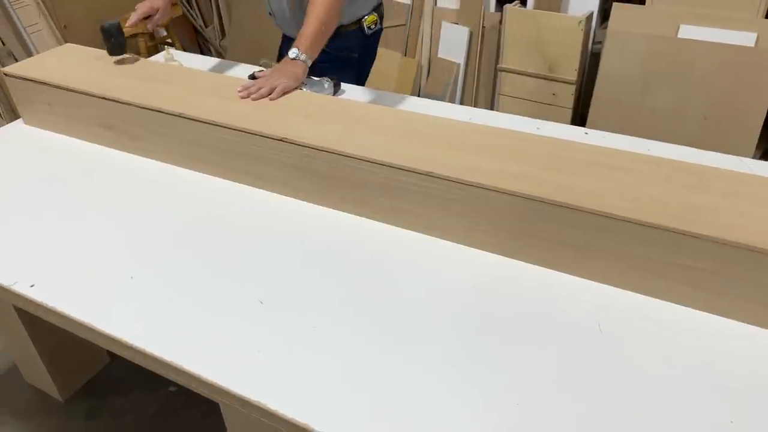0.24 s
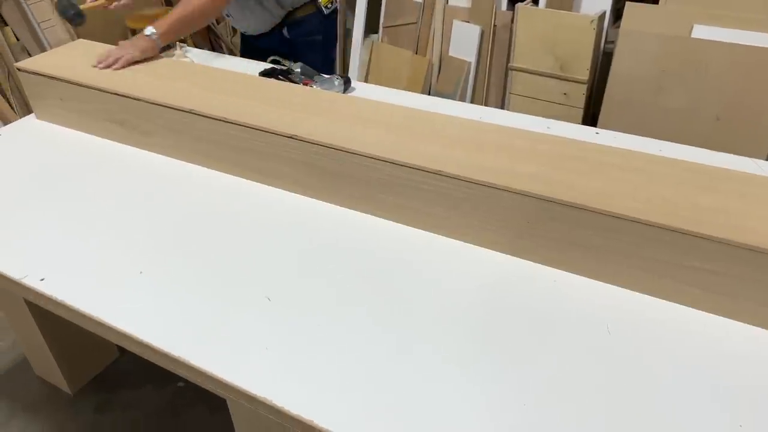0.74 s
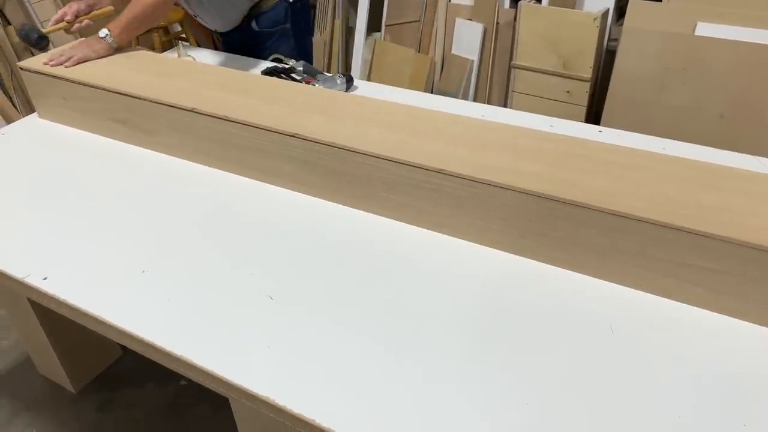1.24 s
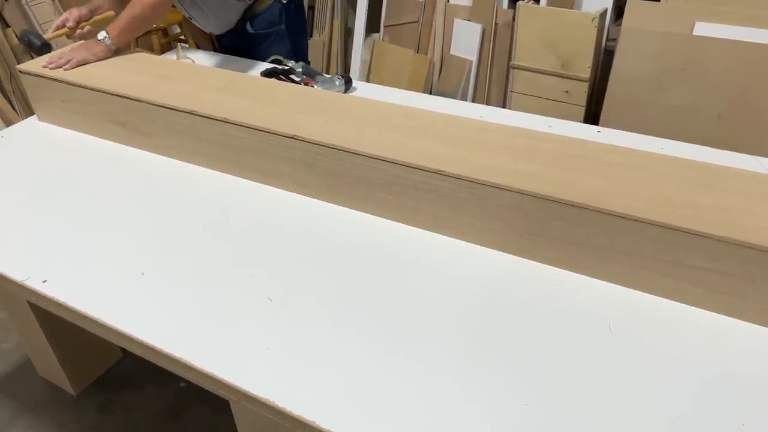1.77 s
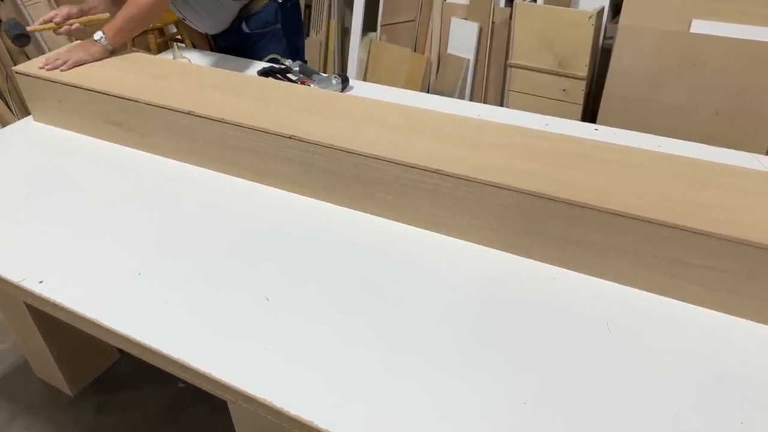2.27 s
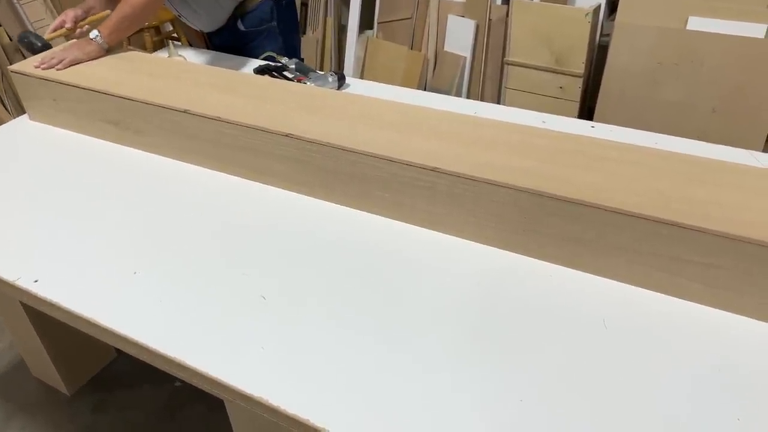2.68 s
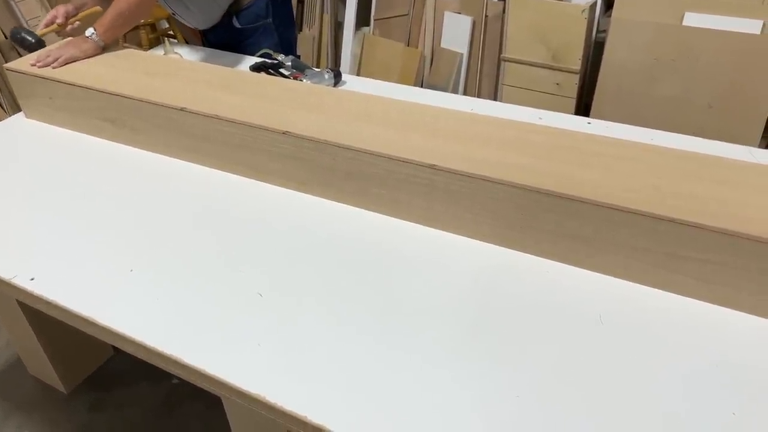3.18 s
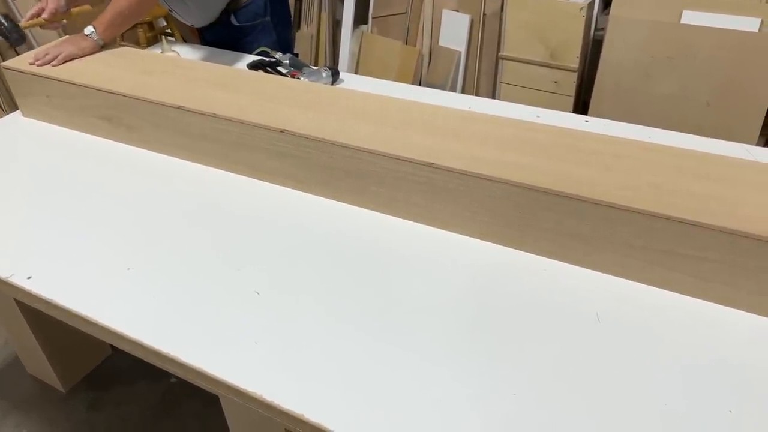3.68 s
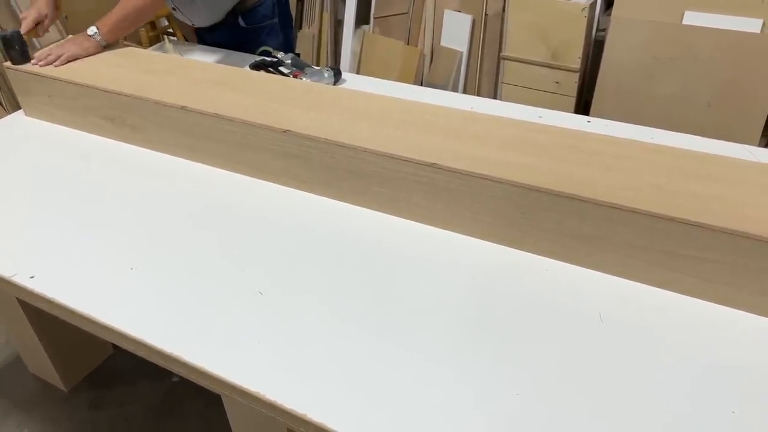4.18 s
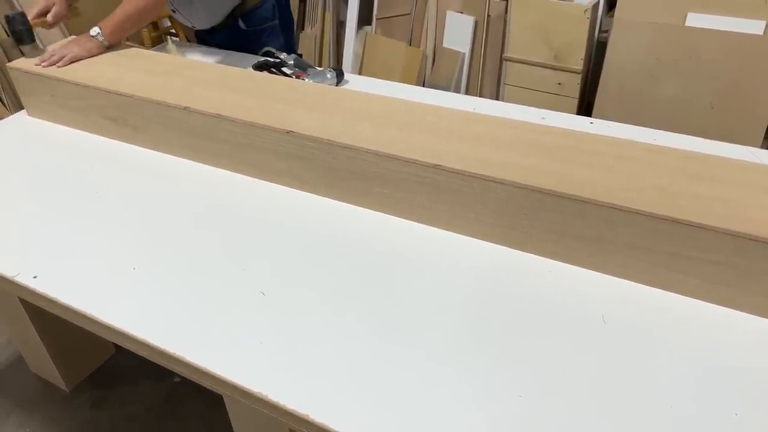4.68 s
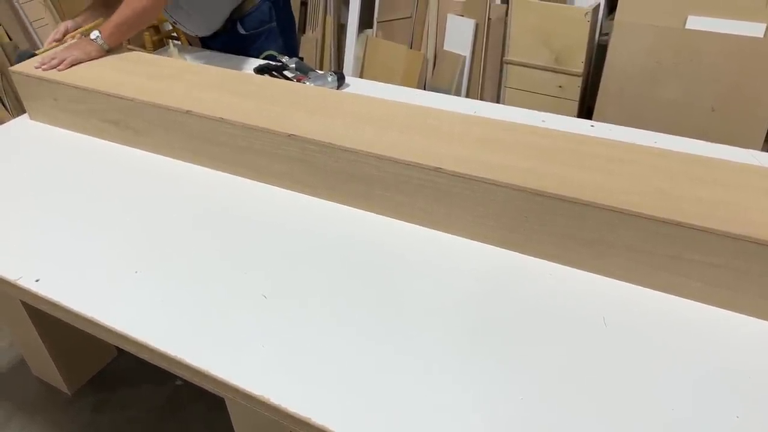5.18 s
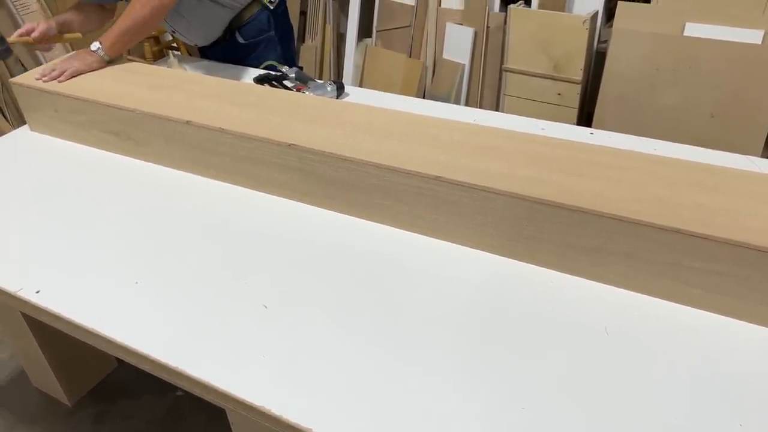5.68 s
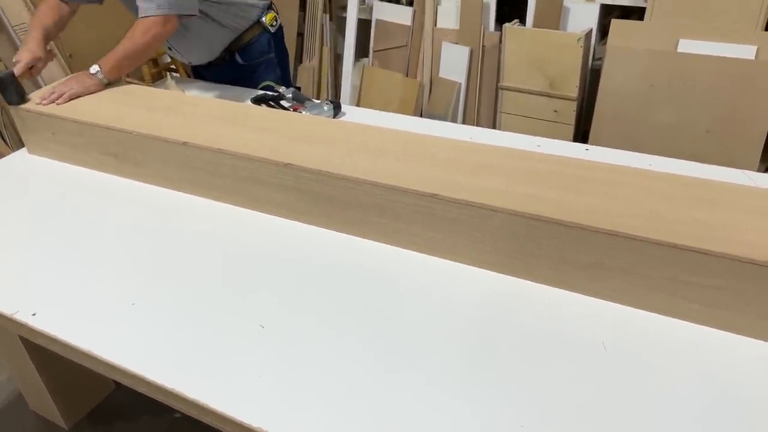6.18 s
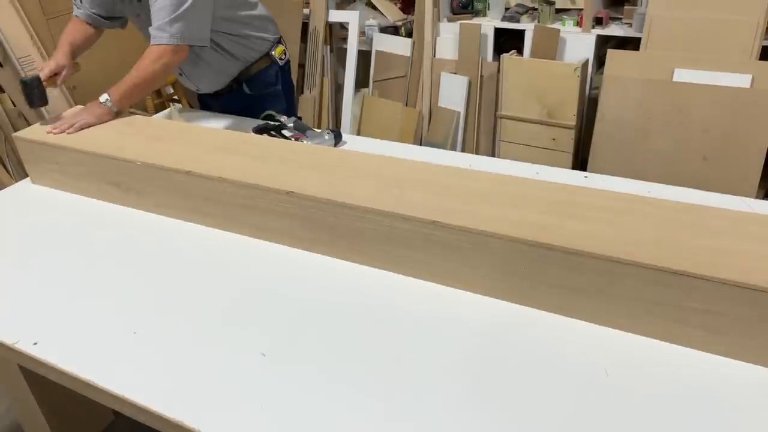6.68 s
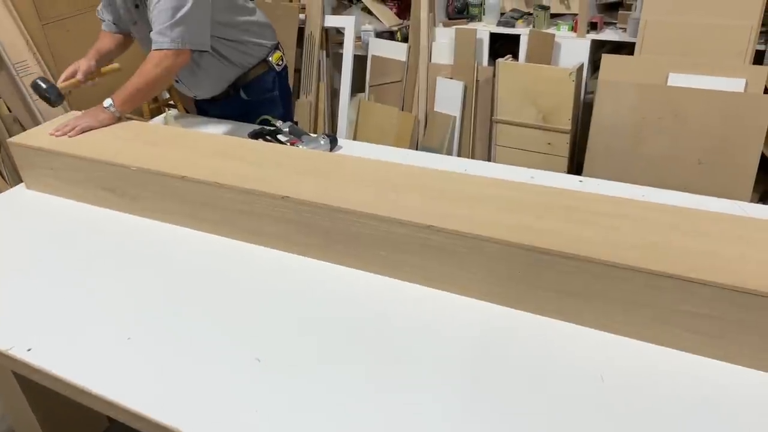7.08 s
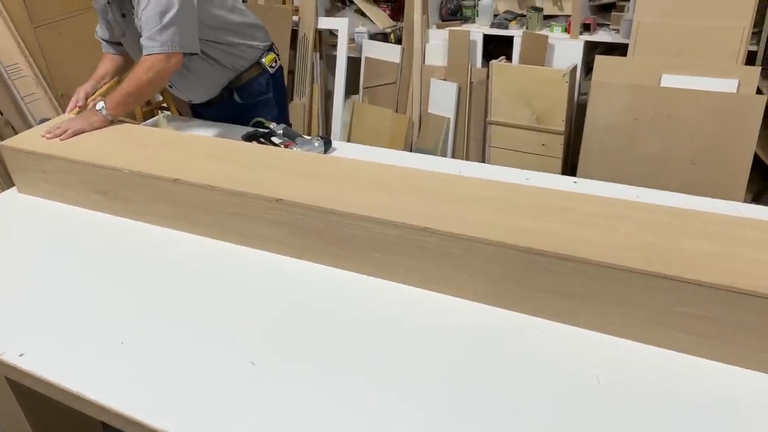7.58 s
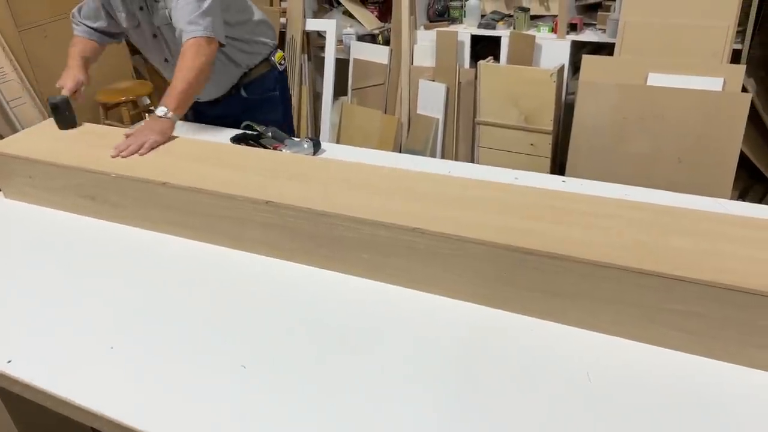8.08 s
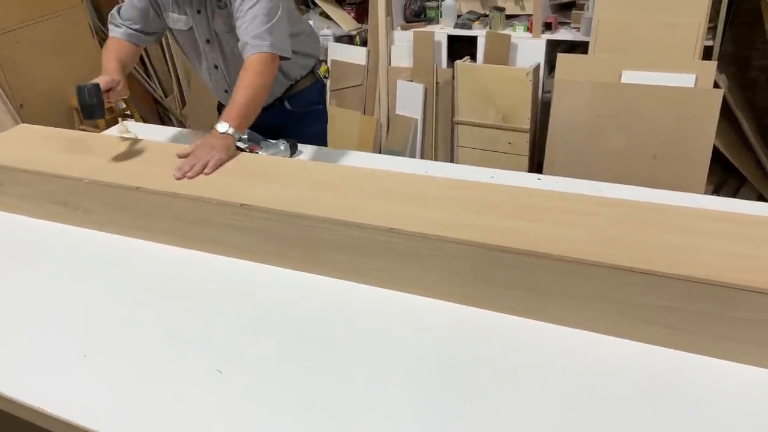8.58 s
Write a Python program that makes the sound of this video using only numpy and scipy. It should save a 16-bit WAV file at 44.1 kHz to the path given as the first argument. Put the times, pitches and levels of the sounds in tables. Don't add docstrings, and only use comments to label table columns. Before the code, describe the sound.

A rubber mallet knocks a long wooden board onto a hollow plywood box, uneven hard cracking thuds ringing briefly in a live workshop over faint hiss.

```python
import sys
import numpy as np
from scipy import signal
from scipy.fft import rfft, irfft
from scipy.io import wavfile

SR = 44100
rng = np.random.default_rng(int(sys.argv[2]) if len(sys.argv) > 2 else 0)


def digitize_waveform(pressure):
    field = np.atleast_2d(pressure).T
    bounded = np.clip(field, -1, 1)
    quanta = np.round(bounded * 32767).astype(np.int16)
    wavfile.write(sys.argv[1], SR, quanta)


def ratio(d):
    e = np.asarray(d, float) / 20
    return 10 ** e


N = 389844

# start in seconds, force in dB, backing in dB (how solidly the spot
# rests on the bench), slap of the closing joint in dB, spot in Hz (pitch of the panels nearest the head).
BLOWS = [(0.1338, -10.5, 3, -6.5, 450), (0.3142, -11.5, 0.5, -6.5, 565), (1.333, -17.5, -6.5, -13.5, 557),
         (1.6603, -7.5, -11.5, -9, 725), (1.7043, -10, -19, -19.5, 700), (2.0015, -3.5, -9, -4, 497),
         (2.3487, -1, -10.5, -11, 586), (2.6945, -1.5, -10.5, -10.5, 578), (3.0324, -6.5, -5.5, -3, 470),
         (3.3689, -5, -6, -12, 610), (4.18, 3.5, -7, -9, 762), (4.4764, 2, -5, -3, 415.5),
         (5.367, -45, -15.5, -29.5, 460), (5.3807, -10, -16, -22.5, 537), (5.7734, -45, -8, -18.5, 447),
         (5.9103, -6.5, 0, -1, 390), (6.1908, 3, -6.5, -5.5, 638), (6.4682, -0.5, -2.5, 1.5, 1400),
         (7.3456, -1, -21, -16, 490), (7.5864, -4, -8.5, -13, 519), (8.1053, 8, -15.5, -13, 615),
         (8.8393, -40.5, -9, 8, 599)]
# frequency in Hz, level in dB, t60 in seconds.
BENCH_MODES = [(57.6, -16, 0.33), (87, -20, 0.47), (127.1, -7.5, 0.34), (142.04, 2.1, 0.19),
               (176.8, -3, .2)]
# frequency in Hz, level in dB, t60 in seconds.
BOX_MODES = [(210, 13.5, 0.087), (264.57, 6, 0.14), (294.5, 3.5, 0.1718), (362.6, 4.5, 0.13),
             (422.4, -0.5, 0.12), (443.8, -3.5, 0.13), (490, 4, 0.11), (534.5, 3.5, 0.16),
             (589.5, -4.5, 0.18), (640, -0.5, 0.16), (700, -7, 0.21), (738.3, -0.5, .14), (807.6, -2, 0.16),
             (874.4, -4, 0.21), (966, -7, 0.074), (1031.5, 2, 0.11), (1105, -7, 0.36), (1204, -3, 0.14),
             (1352, -2.5, 0.094), (1513, -4.5, 0.19), (1723, -4.5, 0.023), (2020, -13.5, 0.061),
             (2434, 13.5, 0.016), (2486, -13.5, .06)]
# frequency in Hz, density in dB per Hz.
CRACK_SPECTRUM = [(700, 5), (1300, 2), (2500, -5), (4000, -12), (6500, -17.5), (10000, -30.5), (16000, -46)]
# start in seconds, snap over the slap in dB,
# slap tilt in dB per octave, echo share in dB.
STANCES = [
    (0, 23, -1, 2.5),
    (1.1, 16, 3, -1.5),
    (1.5, 21.5, -0.6, -0.76),
    (3.9, 12.5, 2.5, -0.4),
    (5.2, 10.5, 1.3, 0),
    (7.1, 1, 1.84, -0.2),
    (7.9, 13.5, 1, -0.5),
    (8.6, 11, 2, -1),
]
# start in seconds, box level in dB, bench level in dB.
TOUCHES = [
    (0.01, -45.5, -48),
    (0.055, -46, -47.5),
    (0.082, -48, -50.5),
    (7.935, -64.5, -36.5),
    (8.0, -58.5, -40),
]
# full speed from, in seconds, until, in seconds, level in dB, speeding up in dB per second.
PALM_STROKES = [
    (0.899, 0.915, -39.5, 146.5),
    (8.093, 8.101, -39, 54.5),
    (8.472, 8.668, -38.5, 53.5),
]
# frequency in Hz, density in dB per Hz.
PALM_SPECTRUM = [(530, -20), (900, -15), (1140, 0), (1210, -1.5), (1420, -6), (1520, 1), (4550, 4),
                 (10900, -0.5), (15500, -24)]
# frequency in Hz, t60 in seconds, echo level in dB, left-right likeness (-1 to 1).
SHOP = [(40, 0.29, -10, 1), (130, 0.59, -14, 0.86), (280, 0.61, -10.5, 0.44), (680, 0.76, -7, 0.27),
        (1400, 0.79, -5.5, -0.092), (3070, 0.8, -5.5, -0.049), (7400, 0.58, -9.5, -0.21),
        (14874, 0.23, -11.5, 0.63)]
# frequency in Hz, density in dB per Hz.
HISS_SPECTRUM = [(20, 15), (40, -6), (70, -10), (130, -12.5), (200, -18), (500, -22.5), (1230, -29.5),
                 (3450, -26), (5000, -23), (8000, -19.5), (10500, -19), (13000, -22.5), (15500, -25.5)]
# frequency in Hz, left-right likeness (-1 to 1).
HISS_LIKENESS = [(60, 0.9), (150, -0.1), (300, 0.5), (3000, 0.6), (7000, -0.3), (15000, 0.1)]

SPAN = 16384
SPOTS = 3


def blows():
    direct = np.zeros((2, N + SPAN))
    spread_out = np.zeros((SPOTS, N + 2 * SPAN))
    t = np.arange(SPAN) / SR
    box_hz = np.array(BOX_MODES)[:, :1]
    for k, (s, force_db, backing_db, slap_db, spot_hz) in enumerate(BLOWS):
        _, tilt_db, echo_db = stance(s)
        spread_octaves = 1.84 * 2 ** (backing_db / 11)
        near_db = np.maximum(-6 * (np.log2(box_hz / spot_hz) / spread_octaves) ** 2, -13)
        hit = struck(BENCH_MODES, force_db + backing_db + 7.5, t,
                     rise_s=0.0042, rise_cycles=0.76, uneven_db=3.5, skew=0.2)
        hit += struck(BOX_MODES, force_db - 2 + near_db, t,
                      rise_s=0.002, rise_cycles=0.11, uneven_db=3, skew=0.4)
        hit += ratio(force_db + slap_db + 17) * crack(t, tilt_db)
        start = round((s - 0.0015) * SR)
        direct[:, start:start + SPAN] += hit
        later = start + 110
        spread_out[k % SPOTS, later:later + SPAN] += ratio(echo_db) * radiated(hit)
    return direct[:, :N], spread_out[:, :N]


def stance(s):
    return [row for row in STANCES if row[0] <= s][-1][1:]


def struck(modes, gains_db, t, rise_s, rise_cycles, uneven_db, skew):
    hz, level_db, t60 = np.transpose(modes)[:, :, None]
    luck = rng.standard_normal((len(modes), 4))
    swell = (1 - np.exp(-t / (rise_s + rise_cycles / hz))) ** 2
    size = ratio(level_db + gains_db + uneven_db * luck[:, :1] - 60 * t / t60) * swell
    phase = 2 * np.pi * hz * (1 + 0.0086 * luck[:, 1:2]) * t + 2 * luck[:, 2:3]
    apart = skew * luck[:, 3:] * np.sqrt(hz / 500)
    return np.array([(size * np.sin(phase + side * apart)).sum(axis=0) for side in (1, -1)])


def crack(t, tilt_db, rise_s=0.00024, peak_s=0.0023, quick_t60=0.022, rattle_t60=0.12, rattle_db=-9):
    colour = [(hz, level_db + tilt_db * np.log2(hz / 2500)) for hz, level_db in CRACK_SPECTRUM]
    noise = coloured(colour, SPAN, [(500, 1.0), (3000, 0.94), (12000, 0.2)])
    after = np.maximum(t - peak_s, 0)
    grow = np.exp(np.minimum(t - peak_s, 0) / rise_s)
    decay = ratio(-60 * after / quick_t60) + ratio(rattle_db - 60 * after / rattle_t60)
    return noise * grow * decay


def snaps(rise_s=0.0006, fall_s=0.0013, lag_s=0.0009, glide=60):
    out = np.zeros(N + 400)
    t = np.arange(-100, 300) / SR
    shape = np.exp(-(t / np.where(t < 0, rise_s, fall_s)) ** 2)
    dull_hz, sharp_hz, turn_db, soft_db = 1591, 2450, -15.5, -0.03
    follows = 0.94
    for s, force_db, _, slap_db, _ in BLOWS:
        stiff = (1.5 + np.tanh((force_db + slap_db - turn_db) / soft_db)) / 2
        hz = dull_hz + stiff * (sharp_hz - dull_hz)
        cycles = hz * t * (1 - glide * t)
        turn = 2 * np.pi * rng.random(2)
        wave = np.sin(2 * np.pi * cycles + turn[0])
        wave += 0.5 * np.sin(2 * np.pi * 1.9 * cycles + turn[1])
        snap_db = follows * (force_db + slap_db + 13.5) - 12.5 + stance(s)[0]
        start = min(round((s + lag_s) * SR) - 100, N)
        out[start:start + len(t)] += ratio(snap_db) * shape * wave
    return out[:N]


def touches():
    out = np.zeros((2, N + SPAN))
    t = np.arange(SPAN) / SR
    tilt_db = 5 * np.log2(np.array(BOX_MODES)[:, :1] / 700)
    for s, box_db, bench_db in TOUCHES:
        hit = struck(BOX_MODES, box_db + tilt_db - 250 * t, t,
                     rise_s=0.006, rise_cycles=0.4, uneven_db=4.5, skew=0.6)
        hit += struck(BENCH_MODES, bench_db, t, rise_s=0.012, rise_cycles=0.6, uneven_db=1.5, skew=0.3)
        start = round(s * SR)
        out[:, start:start + SPAN] += hit
    return out[:, :N]


def palm(lift_db_per_s=207.5):
    level = np.zeros(N)
    t = np.arange(N) / SR
    for full_s, until_s, level_db, rise_db in PALM_STROKES:
        swell_db = -rise_db * np.maximum(full_s - t, 0)
        lift_db = -lift_db_per_s * np.maximum(t - until_s, 0)
        level += ratio(level_db + 1.0 + swell_db + lift_db)
    return level * coloured(PALM_SPECTRUM, N, [(500, 0.5), (4000, 0.35), (9000, 0.046)])


def radiated(hit, octaves=0.13):
    power = np.mean(np.abs(rfft(hit)) ** 2, axis=0)
    power = smoothed(smoothed(power, octaves), octaves)
    cepstrum = irfft(np.log(power + 1e-12) / 2)
    cepstrum[1:SPAN // 2] *= 2
    cepstrum[SPAN // 2 + 1:] = 0
    return irfft(np.exp(rfft(cepstrum)))


def smoothed(power, octaves):
    summed = np.cumsum(power)
    bins = np.arange(len(power))
    octaves = octaves * np.clip(bins * SR / SPAN / 600, 1, 3)
    low = bins * 2 ** -octaves - 1
    high = np.minimum(bins * 2 ** octaves + 1, bins[-1])
    return (np.interp(high, bins, summed) - np.interp(low, bins, summed)) / (high - low)


def shop(pulses, arrive_s=0.0049, near_t60=0.2, near_db=6):
    t = np.arange(SR) / SR
    edges = 30 * 2 ** np.arange(0, 9.6, 0.5)
    white = rng.standard_normal((2, 2, SR))
    answer = 0
    for k, (low, high) in enumerate(zip(edges, edges[1:])):
        band = signal.butter(2, [low, high], "band", fs=SR, output="sos")
        mid, side = signal.sosfilt(band, white[k % 2])
        hz = np.sqrt(low * high)
        fade = ratio(-60 * t / at_hz(SHOP, hz)) + ratio(near_db - 60 * t / near_t60)
        fade *= 1 - np.exp(-t / arrive_s)
        fade *= ratio(at_hz(SHOP, hz, axis=2)) / np.sqrt(np.sum(fade ** 2))
        answer = answer + fade * left_right(mid, side, at_hz(SHOP, hz, axis=3))
    return signal.oaconvolve(pulses[None], answer, axes=1)[:, :N]


def hiss(level_db=-43.5):
    return ratio(level_db + 8.0) * coloured(HISS_SPECTRUM, N, HISS_LIKENESS)


def coloured(spectrum, size, likeness):
    hz = np.arange(size // 2 + 1) * SR / size
    mid, side = rfft(rng.standard_normal((2, size))) * ratio(at_hz(spectrum, hz))
    return rms_one(irfft(left_right(mid, side, at_hz(likeness, hz)), size))


def left_right(mid, side, likeness):
    alike = np.clip(likeness, -1, 1)
    return np.sqrt(1 + alike) * mid + np.sqrt(1 - alike) * side * [[1], [-1]]


def at_hz(points, hz, axis=1):
    rows = np.array(points)
    return np.interp(np.log(np.maximum(hz, 1)), np.log(rows[:, 0]), rows[:, axis])


def rms_one(x):
    return x / np.sqrt(np.mean(x ** 2) + 1e-20)


def scene():
    direct, spread_out = blows()
    direct += snaps()
    direct[1] = np.roll(direct[1], 2)
    direct[1, :2] = 0
    echoes = ratio(1.0) * sum(shop(pulses) for pulses in spread_out)
    return direct + echoes + palm() + hiss() + touches()


def low_pass(x):
    return signal.sosfilt(signal.butter(12, 15670, fs=SR, output="sos"), x)


def record(dry, knee=23.0, port_hz=58, output_hz=34):
    port = signal.butter(2, port_hz, "high", fs=SR, output="sos")
    cut = signal.sosfilt(port, dry)
    squeezed = cut / (1 + np.abs(cut) ** knee) ** (1 / knee)
    output = signal.butter(2, output_hz, "high", fs=SR, output="sos")
    finished = signal.sosfilt(output, squeezed)
    return low_pass(finished)


dry = scene()
out = record(dry)
digitize_waveform(out)
```